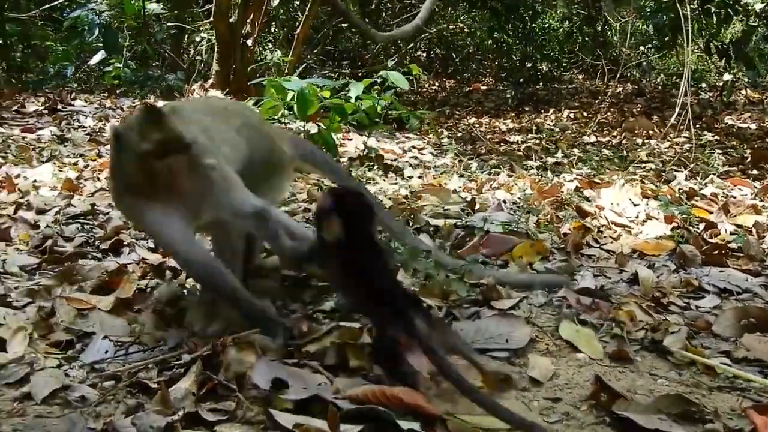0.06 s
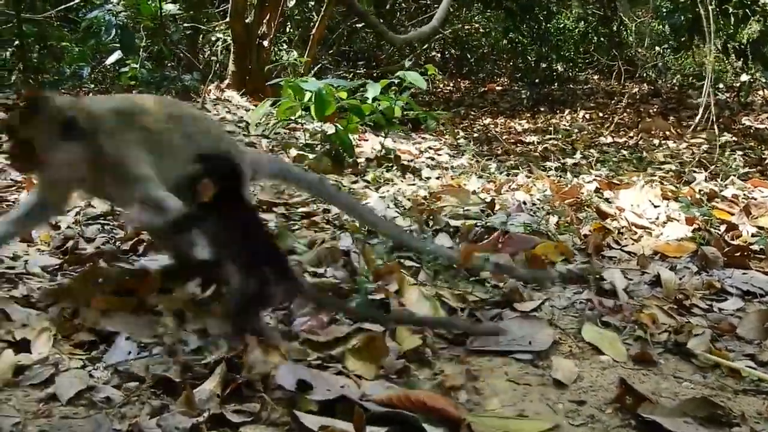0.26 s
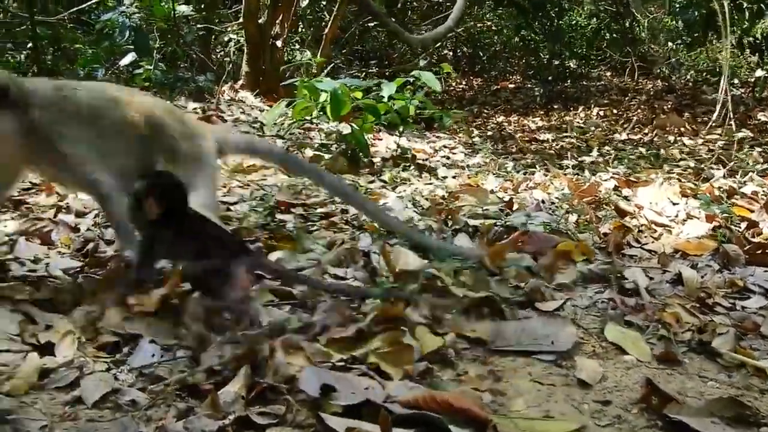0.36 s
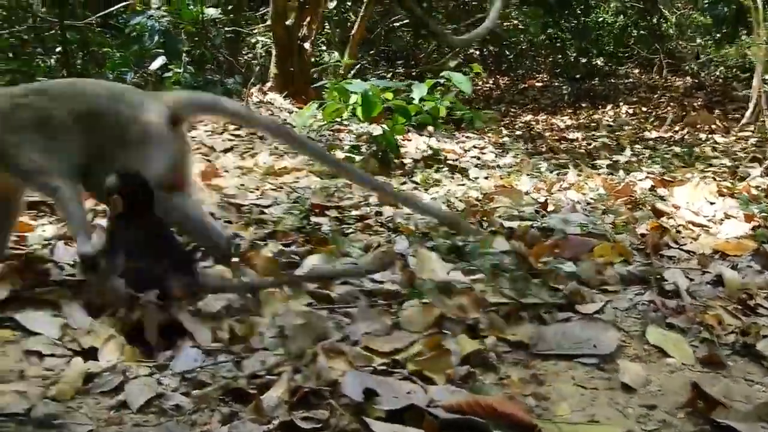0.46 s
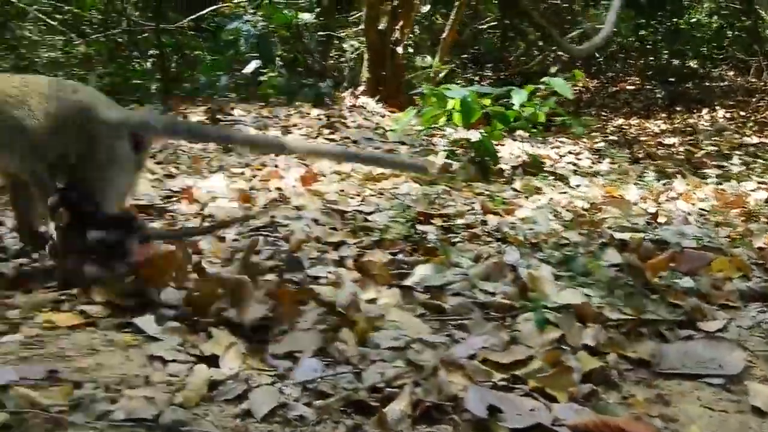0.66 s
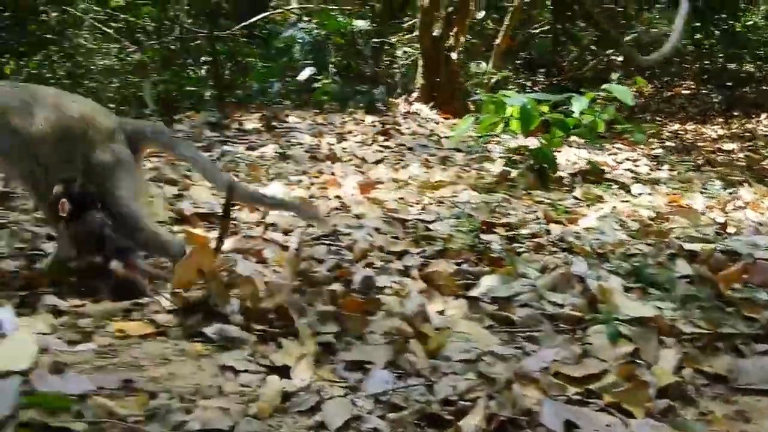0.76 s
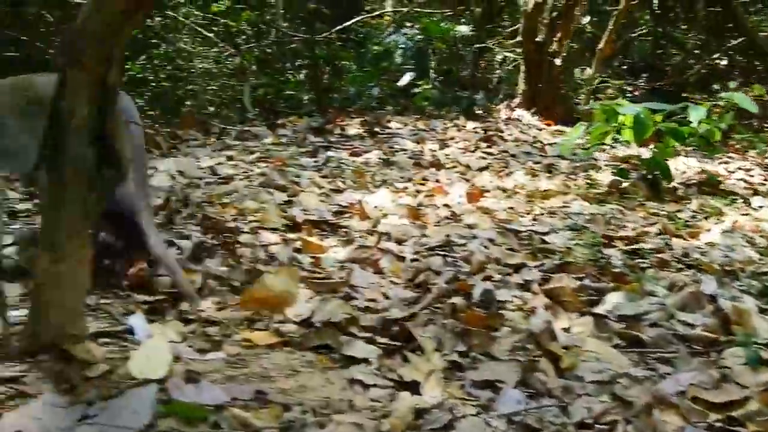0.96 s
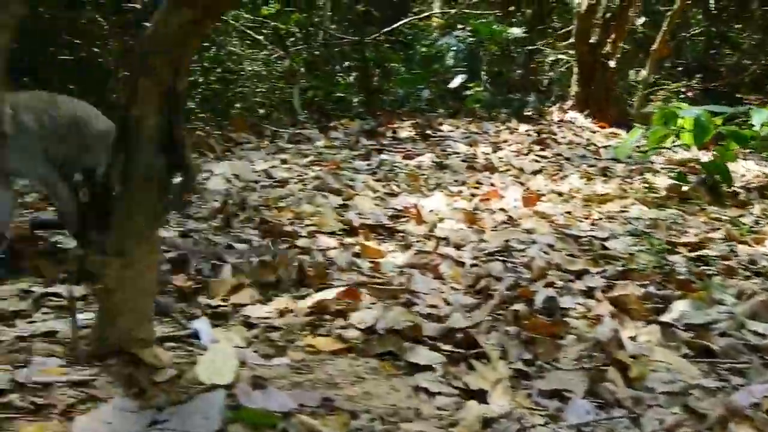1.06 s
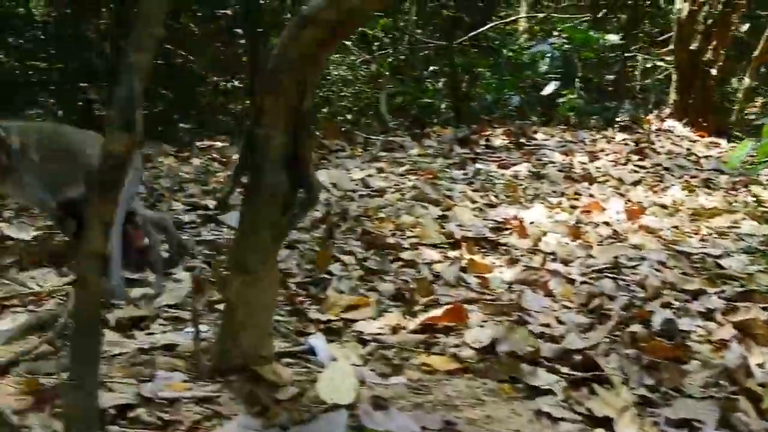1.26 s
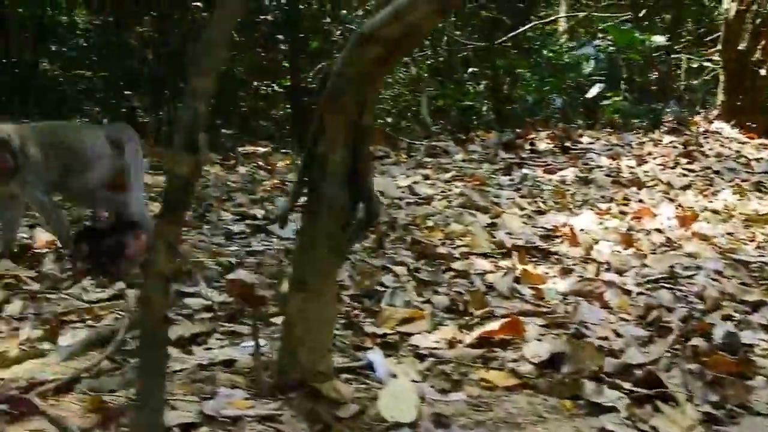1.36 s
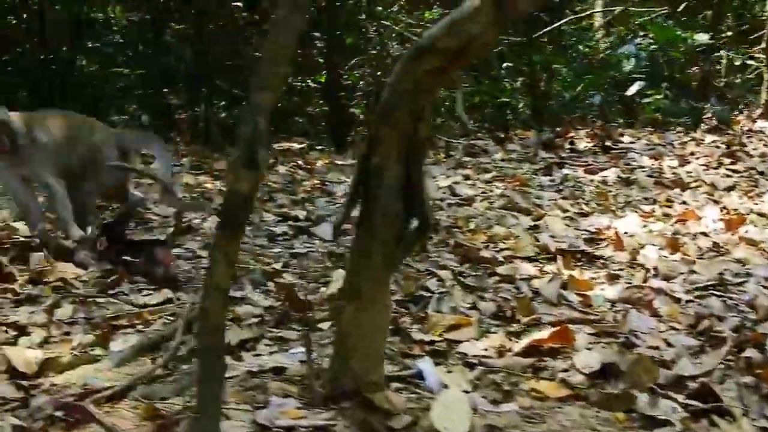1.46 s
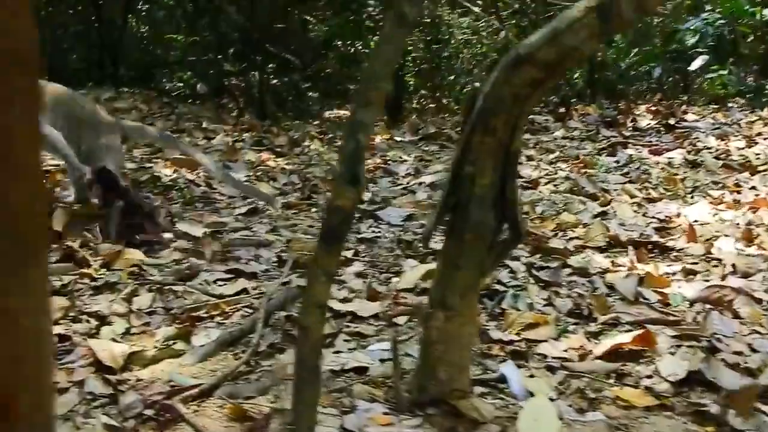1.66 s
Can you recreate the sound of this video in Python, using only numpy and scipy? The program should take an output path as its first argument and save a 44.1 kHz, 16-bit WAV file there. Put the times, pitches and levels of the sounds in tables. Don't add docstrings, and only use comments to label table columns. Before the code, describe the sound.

Thin whistling monkey squeals, rasping and very high, come in short bursts over busy dry leaf crunching, with slight echo off trunks; the last is faint. Harsh small-camera sound, background hiss dipping after loud calls.

```python
import sys
import numpy as np
from scipy import signal
from scipy.fft import rfft, irfft
from scipy.io import wavfile
from scipy.ndimage import uniform_filter1d

SR = 44100
rng = np.random.default_rng(int(sys.argv[2]) if len(sys.argv) > 2 else 0)


def volts_from_db(level):
    exponent = np.asarray(level, float) / 20
    return 10 ** exponent


def output_pcm(signal):
    pcm = np.clip(np.atleast_2d(signal).T, -1, 1) * 32767
    wavfile.write(sys.argv[1], SR, np.round(pcm).astype(np.int16))


N = 74970
T = np.arange(N) / SR


def evened(x):
    return x / np.sqrt(np.mean(abs(x) ** 2) + 1e-20)


def read(points, hz):
    f, value = np.transpose(points)
    return np.interp(np.log(hz + 1), np.log(f + 1), value)


def curve(points):
    return np.interp(T, *np.transpose(points))


def panned(pan_db):
    return np.array([[pan_db / 2], [-pan_db / 2]])


def wobble(hz, count):
    z = rng.standard_normal(count) + 1j * rng.standard_normal(count)
    r = np.exp(-2 * np.pi * hz / SR)
    return evened(signal.lfilter([1], [1, -2 * r, r * r], z))


def hiss(colour, patchy_db):
    # f/Hz, likeness 0-1
    likeness = [(60, 0.3), (240, 0.75), (950, 0.89), (3770, 0.51), (15000, 0.03)]
    # f/Hz, phase/rad
    left_lead = [(0, -0.1), (6460, 0.9), (8960, 0.8), (13100, 0.69), (15200, -0.1)]
    # f/Hz, level/dB
    lean = [(200, -1), (700, -2.5), (1300, -2), (2400, 1.1), (4400, 1.1), (15000, -0.3)]
    frames, hz = N // 128 + 5, np.fft.rfftfreq(512, 1 / SR)
    a, b, c, d, patches = rng.standard_normal((frames, 257, 5)).T
    patches = uniform_filter1d(patches, size=8, axis=0)
    patches = evened(uniform_filter1d(patches, size=14, axis=1))
    same = np.clip(read(likeness, hz), -1, 1)[:, None]
    delay = np.exp(-1j * read(left_lead, hz))[:, None]
    left = a + 1j * b
    right = same * left * delay + np.sqrt(1 - same ** 2) * (c + 1j * d)
    side_db = np.array([.5, -.5])[:, None, None] * read(lean, hz)[:, None]
    gain = volts_from_db(read(colour, hz)[:, None] + patchy_db * patches + side_db)
    noise = signal.istft(np.array([left, right]) * gain, nperseg=512, noverlap=384)[1]
    return evened(noise[:, :N])


def tint(x, colour):
    log_gain = np.log(volts_from_db(read(colour, abs(np.fft.fftfreq(1024, 1 / SR)))))
    taps = np.fft.ifft(np.exp(np.conj(signal.hilbert(log_gain)))).real[:512]
    return signal.oaconvolve(x, taps[None] / np.linalg.norm(taps))[:, :N]


def engine():
    # multiple of the firing rate, level/dB
    orders = [(2, -44.5), (3, -51.5), (4, -39.5), (5, -43), (6, -41.5), (7, -45.5), (9, -53)]
    # f/Hz, width/Hz, level/dB
    whines = [
        (1723, 67, -47.5),
        (3400, 100, -49.5),
        (800.5, 54, -52.5),
    ]
    firing_hz, waver_hz = 39.6, 5
    drone_hz, drone_width_hz, drone_db = 202.3, 148, -34.5
    tones = 0
    for k, db in orders:
        waver = evened(.7 + wobble(waver_hz, N))
        tones = tones + volts_from_db(db) * np.exp(2j * np.pi * k * firing_hz * T) * waver
    for hz, width, db in whines:
        tones = tones + volts_from_db(db) * np.exp(2j * np.pi * hz * T) * wobble(width, N)
    carrier = volts_from_db(drone_db) * np.exp(2j * np.pi * drone_hz * T)
    middle = carrier * wobble(drone_width_hz / 2, N)
    sides = carrier * wobble(drone_width_hz / 2, N)
    return (tones + middle + 0.2 * sides * np.array([[1], [-1]])).real


def forest_air():
    # f/Hz, level/dB
    air = [(40, -30), (80, 3), (300, -4.5), (1100, -8.5), (2600, -13), (7000, -12.5), (9200, -18.5),
           (11500, -46), (15500, -46)]
    return volts_from_db(-39.5) * hiss(air, patchy_db=1.2)


def leaf_crackle(colour):
    cracks_per_s, spread_db = 3000, 1.5
    size = volts_from_db(spread_db * np.minimum(rng.exponential(1, N), 3.5))
    size = size * (rng.random(N) < cracks_per_s / SR) * rng.choice([-1., 1.], N)
    side = rng.uniform(0.99, 1, (2, N))
    return evened(tint(side * np.array([size, np.roll(size, 1)]), colour))


def leaf_snaps(colour):
    # t/s, level/dB, left over right/dB
    snap_events = [(.2045, -23, -4), (0.2215, -28, -5), (0.437, -21, -2), (0.459, -18.5, 0),
                   (.546, -21.5, -.5), (0.6864, -12.5, .5), (0.7368, -17.5, -6), (.76, -20.5, -2),
                   (0.829, -21.5, 0), (.866, -31, 1), (1.0175, -21, 1), (1.0218, -18, -5), (1.023, -23, -1),
                   (1.031, -14, 3), (1.037, -11.5, 1), (1.291, -30, .5), (1.331, -30, 2), (1.382, -32, 8),
                   (1.439, -24.5, 3), (1.529, -28, 0)]
    snap_t60, onset_s = .03, 0.00089
    level, noise = np.zeros((2, N)), rng.standard_normal(N)
    for s, db, pan_db in snap_events:
        fall_db = -60 * abs(T - s) / snap_t60
        level += volts_from_db(db - 6.5 + fall_db + panned(pan_db)) * np.clip((T - s) / onset_s, 0, 1)
    return tint(level * np.array([noise, np.roll(noise, 1)]), colour)


def leaves():
    # t/s, level/dB
    scramble = [(0, -32.5), (.03, -29), (.12, -32), (.22, -24.5), (.3, -31), (.37, -32.5), (.42, -33),
                (.46, -30.5), (.54, -37.5), (.585, -26), (.68, -25.5), (.78, -34), (.85, -40), (.89, -32.5),
                (.98, -37.5), (1.03, -27.5), (1.1, -39), (1.26, -44.5)]
    # t/s, level/dB
    late_scramble = [
        (1.3, -86),
        (1.385, -51.5),
        (1.43, -41),
        (1.49, -63),
        (1.58, -43),
        (1.66, -47),
        (1.7, -48),
    ]
    # f/Hz, level/dB
    leaf = [(200, -25), (600, -15), (2900, -15.5), (6800, -10), (9000, -4), (10400, -11.5), (11500, -23.5),
            (15500, -27.5)]
    level = volts_from_db(curve(scramble)) + volts_from_db(curve(late_scramble))
    rustle = hiss(leaf, patchy_db=3.0)
    return level * evened(rustle + volts_from_db(-4.5) * leaf_crackle(leaf)) + leaf_snaps(leaf)


def squeal(rows, octave_db, pan_db, lead):
    # t/s, change/dB, width/s
    breaks = [(.247, 1.5, 0.00088), (0.253, -10, .0012), (.26, -4, .0008), (.264, -14, 0.0011),
              (.271, -7, 0.0011), (0.2743, -12, 0.0012), (0.2796, -11, 0.00058), (.283, 0, .0006),
              (0.2884, -5, 0.00083), (.59, 6, 0.00065), (0.5976, -5, 0.00081), (.604, -5, .001),
              (.608, -9, 0.0011), (.6155, -2, 0.00073), (0.712, -13, 0.00045), (1.0192, -8, 0.00092),
              (1.0235, -6, 0.0008), (1.031, -6, 0.00081), (1.0369, -7, 0.0008), (1.0385, 0, 0.00055),
              (1.0506, -7, 0.0012), (1.06, -1, .001), (1.58, -14, .0012), (1.583, -8, .0008),
              (1.592, -4, 0.00073), (1.605, 0, 0.00064)]
    flutter_hz, flutter, jitter_hz, jitter = 300, .24, 170, .013
    throb_hz, throb_depth, throb_spread = 215, .2, .3
    rasp_hz, breath_hz, breath_db = 830, 2620, -16.5
    port_hz, port_width_hz = 8460, 1600

    s, hz, db, rough = np.transpose(rows)
    hz = np.interp(T, s, hz) * (1 + jitter * wobble(jitter_hz, N).real)
    rough = np.clip(np.interp(T, s, rough), 0, 1)
    level_db = np.interp(T, s, db)
    for at, change_db, width in breaks:
        if s[0] < at < s[-1]:
            level_db = level_db + change_db * np.exp(-((T - at) / width) ** 2)
    fade = np.clip(np.minimum(T - s[0], s[-1] - T) / 0.0009, 0, 1)

    throb_rate = throb_hz * (1 + throb_spread * wobble(jitter_hz, N).real)
    throb = 1 + throb_depth * np.cos(2 * np.pi * np.cumsum(throb_rate) / SR)
    clean = evened(throb * (1 + flutter * wobble(flutter_hz, N)))
    harsh = wobble(rasp_hz, N) + volts_from_db(breath_db) * wobble(breath_hz, N)
    voice = (1 - rough) * clean + rough * harsh

    turn = 2 * np.pi * (np.cumsum(hz) - np.array([[0], [lead]]) * hz) / SR
    port = np.exp(-((2 * hz - port_hz) / port_width_hz) ** 2)
    tone = np.exp(1j * turn) + volts_from_db(octave_db) * np.exp(2j * turn) * port
    return np.sqrt(2) * volts_from_db(level_db) * fade * (voice * tone).real * volts_from_db(panned(pan_db))


def monkey():
    # t/s, f/Hz, level/dB, roughness 0-1
    squeal_a = [(.2422, 9774, -12, 0), (.2437, 9775, -6, 0), (.249, 9500, -8.5, 0.35),
                (.258, 9370, -5.5, 0.08), (.268, 9007, -6, 0.25), (.276, 8400, -9.5, 0.11),
                (.285, 7876, -9, 0), (.292, 7860, -17.5, 0.4), (.305, 7360, -27, 0.6)]
    whimper_a = [(.308, 7000, -40, .3), (.317, 6550, -26, .2), (.328, 5300, -37, .3),
                 (.345, 4950, -37, .35), (.36, 4800, -39, .45), (.373, 4650, -33, .45),
                 (.386, 4300, -39, .4), (.392, 3300, -38, .35), (.405, 3050, -42, .4)]
    squeal_b = [(.566, 8300, -33, 0.92), (0.5781, 8700, -11.5, 0.25), (.582, 9000, -20.5, .9),
                (.5855, 10120, -11.5, .3), (.596, 10780, -15, 0.28), (.606, 10600, -17.5, 0.35),
                (.612, 9860, -12.5, 0.15), (.62, 9750, -19.5, 0.75), (0.641, 9235, -17, 0.81),
                (0.683, 8190, -33, 1)]
    catch_b = [(.556, 2257, -40, .3), (.564, 2493, -37, .3), (0.568, 3047, -32.5, 0.4),
               (0.576, 3400, -24.5, 0.41), (.583, 3484, -28.5, 0.38), (.59, 3450, -40, 0.31),
               (.606, 3400, -43, 0.45)]
    whimper_b = [(0.702, 8100, -38, 0.5), (.71, 8000, -26, .5), (.7145, 7700, -18.5, 0.3),
                 (0.718, 7100, -21, 0.55), (.721, 7900, -34, .3), (0.73, 8160, -25, .12),
                 (.745, 8060, -48, .2)]
    chirp_b = [(.737, 4400, -42, .9), (.75, 4100, -39, .8), (.756, 3780, -29, .25), (.762, 3740, -35, .4),
               (.775, 3700, -46, .6)]
    catch_c = [(1.012, 5900, -39, 0.98), (1.018, 5700, -20.5, 0.94), (1.031, 5410, -22.5, 1),
               (1.039, 5080, -31, 0.76), (1.06, 5030, -52, 0.67)]
    squeal_c = [(1.027, 8450, -23, .2), (1.0302, 8800, -7.5, 0.12), (1.038, 9450, -7.5, 0.13),
                (1.045, 9200, -5, 0.094), (1.054, 8900, -15.5, 0.13), (1.06, 8500, -23, 0.18),
                (1.067, 8200, -26, 0.15), (1.076, 8090, -22.5, 0.21), (1.086, 8000, -33, 0.36)]
    squeal_d = [(1.574, 7300, -25, .1), (1.576, 7566, -28, .1), (1.581, 7880, -29, .1),
                (1.586, 8200, -24.5, 0.12), (1.598, 8550, -23.5, 0.086), (1.605, 8040, -25, .1),
                (1.613, 7730, -37.5, .1), (1.619, 7880, -27, .1), (1.63, 7500, -38, .15)]
    rasp_b = [(.574, 4993, -34, .9), (.587, 5876, -24.5, .9), (.61, 5790, -33, 0.82),
              (.63, 5100, -28, 0.86), (0.659, 5056, -32.5, 1), (0.692, 4960, -36, .95)]
    rasp_a = [(.335, 5770, -38, .8), (.362, 5780, -33, 0.87), (.375, 5870, -30.5, .8), (.39, 5830, -45, .8)]
    # octave level/dB, left over right/dB, left leads/samples
    places = [(-40, 0, 0.79), (12, 3, 0.52), (-40, 2, 0.88), (18, 1, 1.5), (-18.5, -5, 0.57),
              (-23, 8, 0.43), (-20, 1, 1.4), (-40, 1, 1.14), (-40, -3, 1.15), (14, 1, 1.16), (-40, 2, 1)]
    calls = [squeal_a, whimper_a, squeal_b, catch_b, whimper_b, chirp_b,
             catch_c, squeal_c, squeal_d, rasp_b, rasp_a]
    direct = sum(squeal(rows, *place) for rows, place in zip(calls, places))
    echo_db, echo_t60, first_echo_s = -17, 0.22, .003
    t = np.arange(SR // 2) / SR
    taps = rng.standard_normal((2, len(t))) * (rng.random((2, len(t))) < .05)
    taps = taps * (t > first_echo_s) * volts_from_db(-60 * t / echo_t60)
    echo = signal.fftconvolve(direct, taps / np.linalg.norm(taps[0]), axes=1)[:, :N]
    return direct + volts_from_db(echo_db) * echo


def scene():
    # t/s, level/dB
    duck = [(0, 6), (.12, 3.5), (.24, 0), (.27, -8.5), (.4, -8), (.55, -4), (.6, -4.5), (.85, -1.5),
            (1.02, 0.5), (1.06, -15.5), (1.3, -15), (1.7, -8.5)]
    background = engine() + forest_air()
    return volts_from_db(curve(duck)) * background + leaves() + monkey()


def top_cut(x):
    return signal.sosfilt(signal.butter(12, 15680, fs=SR, output="sos"), x)


def record(dry):
    # f/Hz, width/Hz, level/dB
    housing = [
        (1750, 380, 0),
        (3335, 420, 1),
    ]
    hz = np.fft.rfftfreq(N, 1 / SR)
    rings = volts_from_db(sum(db * np.exp(-((hz - f) / w) ** 2) for f, w, db in housing))
    bass_cut = hz ** 2 / (hz ** 2 + 45 ** 2)
    heard = irfft(rfft(dry) * rings * bass_cut, N)
    fast = signal.resample_poly(heard, 160, 147, axis=1)
    nearest = np.round(np.arange(N) * 160 / 147).astype(int)
    picked = fast[:, np.minimum(nearest, fast.shape[1] - 1)]
    edge = signal.firwin(255, 15750, window=("kaiser", 9), fs=SR)
    mix = np.clip(signal.oaconvolve(picked, edge[None], "same"), -.95, .95)
    return top_cut(mix)


dry = scene()
out = record(dry)
output_pcm(out)
```